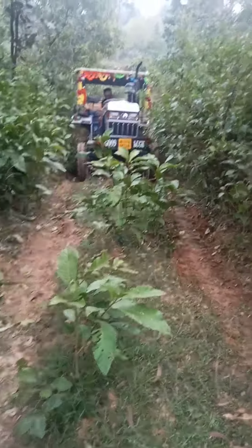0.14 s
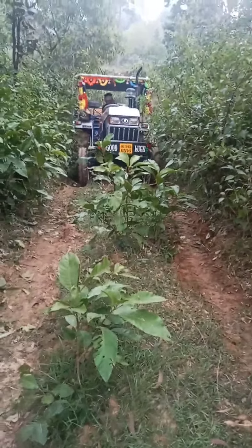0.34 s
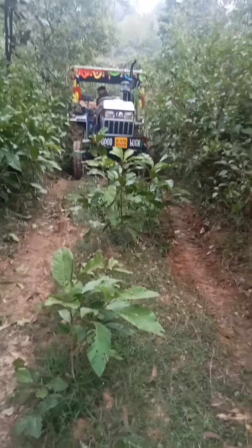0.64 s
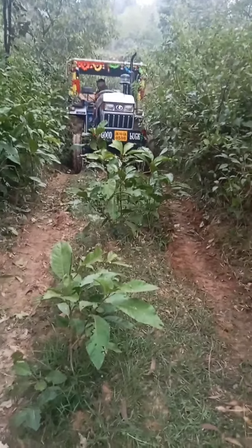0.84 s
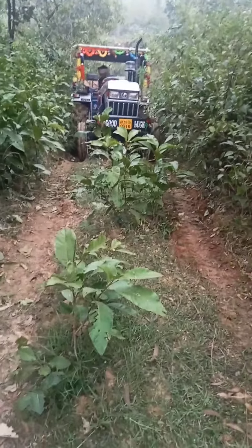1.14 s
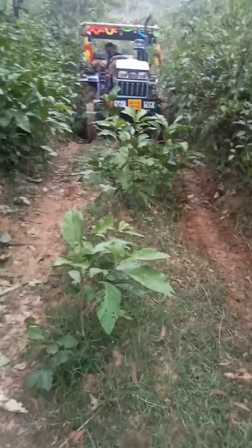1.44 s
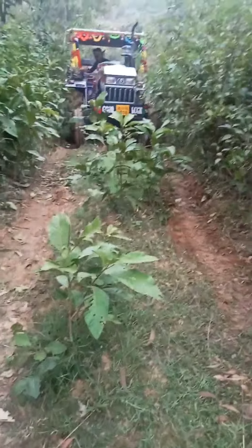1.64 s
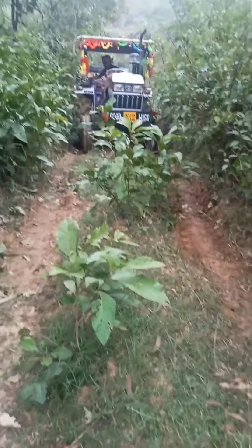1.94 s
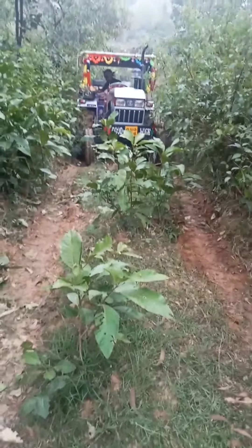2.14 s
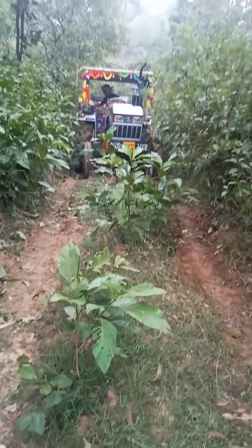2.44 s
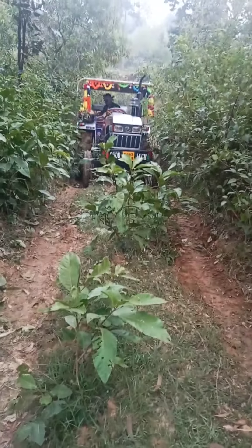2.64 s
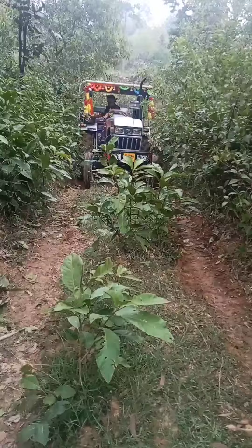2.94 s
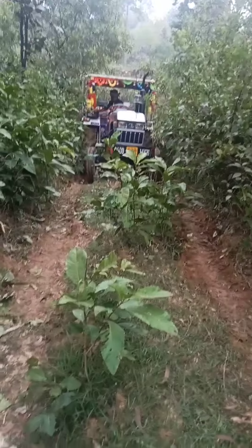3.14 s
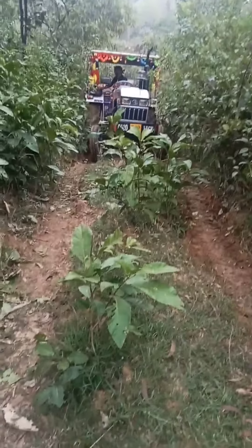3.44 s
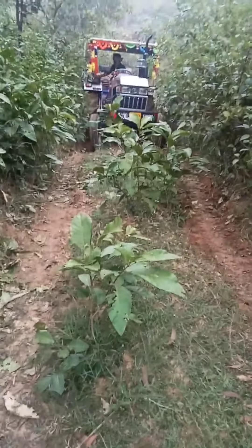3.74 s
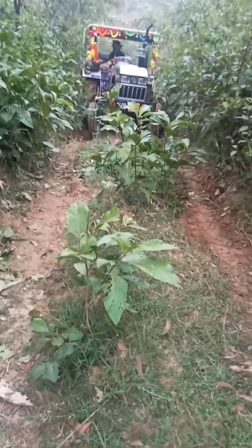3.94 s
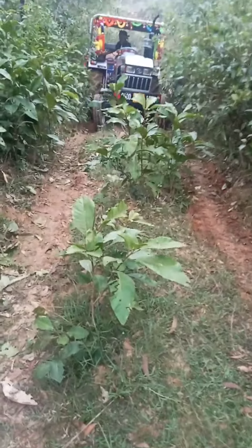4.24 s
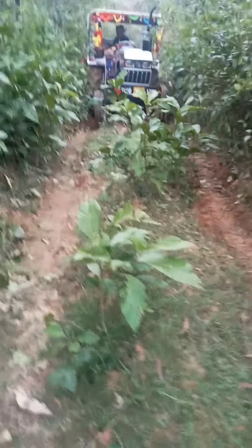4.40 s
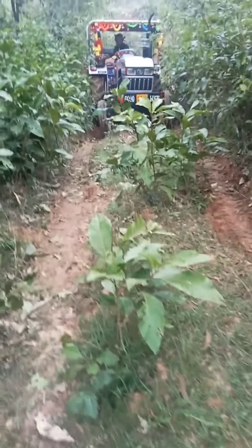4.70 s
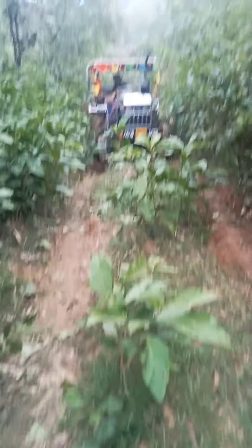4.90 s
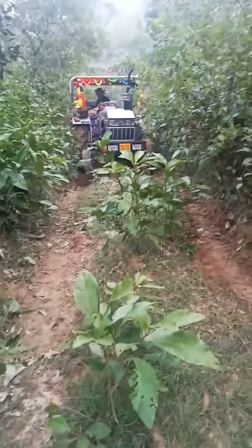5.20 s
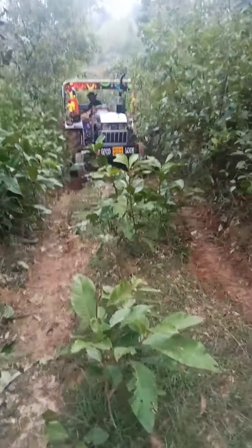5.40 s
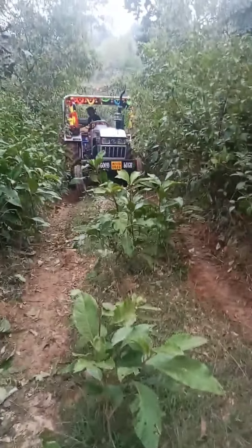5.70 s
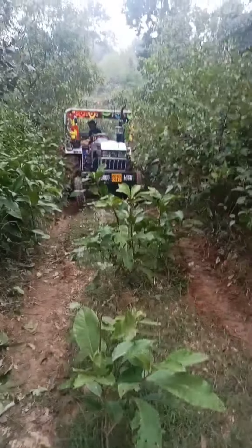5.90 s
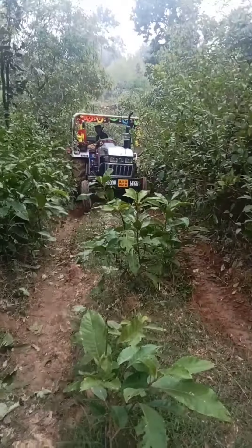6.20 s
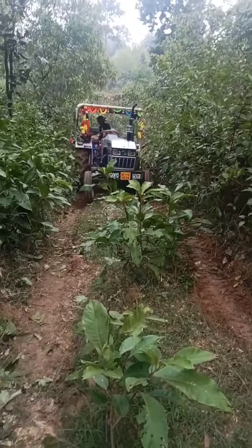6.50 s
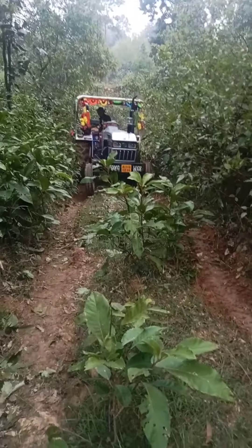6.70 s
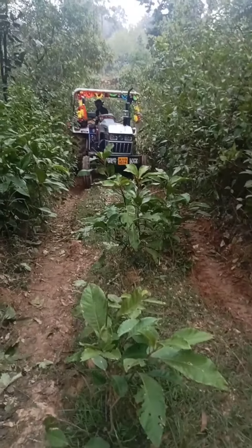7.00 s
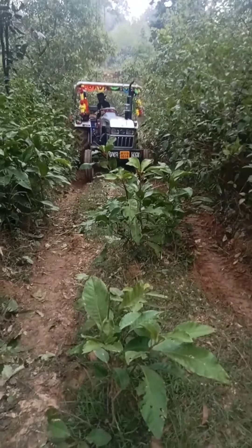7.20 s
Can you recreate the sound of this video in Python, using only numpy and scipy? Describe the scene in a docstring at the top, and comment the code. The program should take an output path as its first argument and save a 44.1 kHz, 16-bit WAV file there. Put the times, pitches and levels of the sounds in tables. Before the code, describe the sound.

A diesel tractor runs at high revs with a loud, rapid exhaust bark. After about a second the throttle shuts and the engine coasts down, clattering, while loose tin rings briefly. The bodywork jolts twice with a rattle and a thud. The engine settles into a quieter idle with a regular metallic knock over low thumps, hollow chugs, ticking and a faint gear whine, heard from along an outdoor dirt track.

```python
"""A diesel tractor barks at high revs, each firing pushing a pulse and a rush of gas out of its exhaust.
After a second the throttle shuts. The three-cylinder engine coasts down, clattering, while loose tin
rings. Fuel returns and it settles into an idle in which one cylinder knocks hardest: the fuel lights
abruptly and the iron clanks. Underneath are low thumps, hollow chugs, ticking, hiss and a gear whine.
The bodywork jolts twice, with a rattle and a thud."""
import sys
import numpy as np
from scipy import signal
from scipy.fft import rfft, irfft
from scipy.io import wavfile
from scipy.ndimage import uniform_filter1d

SR = 44100
rng = np.random.default_rng(int(sys.argv[2]) if len(sys.argv) > 2 else 0)


def wav_out(sig):
    """Save sig, one row per channel (or a flat mono array), as 16-bit PCM at SR to the path in sys.argv[1]."""
    wavfile.write(sys.argv[1], SR, np.round(np.clip(np.atleast_2d(sig).T, -1, 1) * 32767).astype(np.int16))


N = 324135
T = np.arange(N) / SR

IDLE_HZ, LOPE_HZ = 15, 17.9  # firings a second: at idle, and below which the thumps turn more uneven
SHUT_S, SHUTTING_S = 1.016, .0076  # the throttle shuts: when, and how long it takes
REFUEL_S, REFUELLING_S = 2.95, .3  # the governor (speed regulator) feeds fuel again
SETTLE_S, SETTLING_S = 4.37, 0.56  # the idle steadies and its sound fills out


def undb(db):
    """Turn decibels into a gain."""
    return 10 ** (np.asarray(db) / 20)


def unit(x):
    """Scale a signal to an average power of 1."""
    return x / np.sqrt(np.mean(x ** 2))


def curves(table):
    """Join a table's timed points with straight lines, one curve for each column after the time."""
    times, *columns = np.transpose(table)
    return [np.interp(T, times, column) for column in columns]


def colour(x, spectrum, resonances=()):
    """Filter a sound to a spectrum plus resonances; the result has power 1."""
    size = 8192
    hz = np.arange(size // 2 + 1) * SR / size + 1
    points_hz, points_db = np.transpose(spectrum)
    db = np.interp(np.log(hz), np.log(points_hz), points_db, left=-90, right=-90)
    db = db + sum(peak / (1 + (2 * (hz - f) / width) ** 2) for f, width, peak in resonances)
    # folding the cepstrum makes the filter ring after a hit, never before it
    cepstrum = irfft(db * np.log(10) / 20)
    cepstrum[1:size // 2] *= 2
    cepstrum[size // 2 + 1:] = 0
    response = irfft(np.exp(rfft(cepstrum)))
    return unit(signal.fftconvolve(x, response)[:N])


def grit(spread_db, rate_hz):
    """Noise whose level jumps like many small metal contacts."""
    hold = int(SR / rate_hz)
    sizes = undb(spread_db * rng.standard_normal(N))
    return rng.standard_normal(N) * sizes[np.arange(N) // hold]


def bursts(count, hz, lag, rise_s, fall_s, scatter_db, cylinder_db=(0, 0, 0)):
    """One swell and fade per firing, lag firings late, each with its own size."""
    turn = count + 1 - lag
    firing, since = turn.astype(int), turn % 1 / hz
    size = undb(scatter_db * rng.standard_normal(N)[firing] + np.array(cylinder_db)[(firing - 1) % 3])
    return size * (1 - np.exp(-since / rise_s)) * np.exp(-since / fall_s)


def throttle():
    """1 while the throttle is open, then 0."""
    return np.clip((SHUT_S - T) / SHUTTING_S, 0, 1)


def idle_fuel():
    """0 until the governor feeds the idle, then 1."""
    return np.clip((T - REFUEL_S) / REFUELLING_S, 0, 1)


def engine_gain(hz, base_db, octave_db, load_db, fuel_db, settled_db):
    """A layer's gain: its base at idle speed, changed by speed, open throttle, idle fuel and settling."""
    settled = np.clip((T - SETTLE_S) / SETTLING_S, 0, 1)
    coasting_db = base_db + octave_db * np.log2(hz / IDLE_HZ)
    return undb(coasting_db + load_db * throttle() + fuel_db * idle_fuel() + settled_db * settled)


def steady_share():
    """How much noise runs on between strokes: most when the engine gets no fuel."""
    coasting, loaded, idling = .9, .4, .32
    return coasting + (loaded - coasting) * throttle() + (idling - coasting) * idle_fuel()


# Engine speed: (time [s], firings a second [Hz])
FIRING_RATE = [(0, 45.406), (0.35, 45.19), (1, 46.314), (1.4, 37.859), (1.95, 25.278), (2.2, 22.861),
               (2.5, 21.222), (2.9, 19.882), (3.3, 17.94), (3.7, 16.647), (4.1, 16.56), (4.5, 15.854),
               (5.2, 15.31), (7.35, 14.986)]


def firings():
    """The running count of firings, and their rate; every engine sound follows these."""
    hz = curves(FIRING_RATE)[0]
    return 1.14 + np.cumsum(hz) / SR, hz


def gear_whine(count, hz):
    """Gear teeth meet in a wavering tone; three firings take two turns of the crank."""
    teeth = 25
    phase = 2 * np.pi * teeth * count * 2 / 3
    tone = np.sin(phase) + undb(-3) * np.sin(2 * phase) + undb(-1.5) * np.sin(3 * phase)
    waver = undb(6 * unit(uniform_filter1d(rng.standard_normal(N), size=3000)))
    return engine_gain(hz, -61, octave_db=10, load_db=3, fuel_db=-9, settled_db=0) * waver * tone


# High hiss: (frequency [Hz], level [dB])
HISS_SPECTRUM = [(4120, 10.5), (7000, -10.5), (7410, -17.5), (8080, -18.5), (8750, -8), (9630, -14.5),
                 (13000, -1), (15500, -15)]


def hiss(count, hz):
    """A thin hiss swells with each firing."""
    drive = grit(1.5, 400) * (steady_share() ** 2 + .3 + bursts(count, hz, -.02, .003, .014, 4.5))
    gain = engine_gain(hz, -79.5, octave_db=17.5, load_db=8, fuel_db=6.5, settled_db=5.5)
    return gain * colour(drive, HISS_SPECTRUM)


# Engine block and bonnet resonances, and dips where the ground echo cancels:
# (frequency [Hz], width [Hz], boost [dB])
BLOCK_RESONANCES = [(626, 260, 1), (756, 194, 10), (1100, 41, 5.5), (1387, 36, -61), (1650, 50, -5),
                    (1817, 38, 7), (2220, 120, -1.5), (2590, 67, 4.5), (2760, 130, 0.5), (3260, 140, 8),
                    (3560, 33, 3.5), (4050, 67, 3), (4535, 17, 10), (5364, 77, 6.5)]
# Steel injector seats: (frequency [Hz], level [dB])
INJECTOR_SPECTRUM = [(2500, -21), (3500, -1), (4200, -1), (5000, 1.5), (5900, -7.5), (6600, -14.5),
                     (7300, -23.5), (8500, -32)]


def injectors(count, hz):
    """The fuel injectors tick against their seats, once per firing."""
    drive = grit(1.5, 600) * (.12 + bursts(count, hz, .02, .004, .008, 1.3))
    gain = engine_gain(hz, -63.5, octave_db=19, load_db=-4, fuel_db=-12, settled_db=7.5)
    return gain * colour(drive, INJECTOR_SPECTRUM, BLOCK_RESONANCES)


# Air box, space under the bonnet and exhaust pipe: (frequency [Hz], width [Hz], boost [dB])
AIR_RESONANCES = [(240, 35, 5), (335, 35, 6), (625, 50, 8), (1110, 60, 7)]
# Oil pan under the engine: (frequency [Hz], level [dB])
OIL_PAN_SPECTRUM = [(25, -28), (45, -3), (70, -11), (120, -2), (160, -1.5), (235, -0.5), (290, -2),
                    (345, -4), (400, -11.5), (480, -20.5)]


def oil_pan(count, hz):
    """The oil pan rumbles in time with the firings."""
    drive = grit(1.5, 90) * (.2 + bursts(count, hz, .03, .008, .025, 1.5))
    gain = engine_gain(hz, -52, octave_db=15, load_db=-5.5, fuel_db=7, settled_db=1.7)
    return gain * colour(drive, OIL_PAN_SPECTRUM, AIR_RESONANCES)


def thump(count, hz):
    """Each compression stroke pushes a short low wave, with a weaker one ahead of it."""
    pitch_hz, width_s = 92, .0077
    uneven = .3 + .7 * np.clip(LOPE_HZ - hz, 0, 1)
    waves = 0
    for lag, db in [(-.091, 6.5), (-.395, -.5)]:
        turn = count - lag + .5
        stroke = turn.astype(int)
        late_s = .0018 * uneven * rng.standard_normal(N)[stroke]
        from_peak = (turn % 1 - .5) / hz - late_s
        size = undb(db + 2.2 * uneven * rng.standard_normal(N)[stroke])
        waves += size * np.cos(2 * np.pi * pitch_hz * from_peak) * np.exp(-(from_peak / width_s) ** 2)
    gain = engine_gain(hz, -45, octave_db=9, load_db=3.5, fuel_db=-2.5, settled_db=0)
    return gain * unit(waves * np.sqrt(IDLE_HZ / hz))


# Hollow sound of air box and exhaust pipe: (frequency [Hz], level [dB])
CHUG_SPECTRUM = [(330, -16), (470, -4.5), (550, -3), (630, -5), (760, -0.5), (900, -0.5), (1100, -5.5),
                 (1280, -13.5), (1450, -37)]


def chug(count, hz):
    """Air box and exhaust pipe give a rounded puff after every stroke, with little between."""
    puffs = .23 * steady_share() + bursts(count, hz, .037, .0081, .024, 1.2)
    gain = engine_gain(hz, -51.5, octave_db=10, load_db=.5, fuel_db=3.5, settled_db=1.5)
    return gain * colour(grit(1.65, 200) * puffs, CHUG_SPECTRUM, AIR_RESONANCES)


# Clattering valve parts: (frequency [Hz], level [dB])
VALVE_SPECTRUM = [(820, -32), (1400, 2.5), (1780, 0), (2070, -8), (2610, -5.5), (3650, -15.5), (4230, -11),
                  (4980, -14.5), (6700, -35.5), (9000, -51), (11700, -45), (19800, -120)]


def valves(count, hz):
    """The parts that work the valves clatter through the engine block."""
    drive = grit(2, 500) * (steady_share() + bursts(count, hz, -.03, .003, .025, 1.6))
    gain = engine_gain(hz, -47.5, octave_db=8, load_db=4.1, fuel_db=7, settled_db=1.2)
    return gain * colour(drive, VALVE_SPECTRUM, BLOCK_RESONANCES)


# Notes of loose tin: (time of peak [s], frequency [Hz], level [dB], fade time [s])
TIN_NOTES = [(1.059, 219, -20.5, 0.075), (1.147, 293, -21, 0.026), (1.47, 502, -32.5, 0.031),
             (1.45, 993, -32.5, 0.028), (1.042, 3290, -23, 0.0064), (1.733, 787, -31, 0.017),
             (1.753, 212, -30, 0.019)]


def loose_tin():
    """Loose tin swells and fades on single notes while the revs fall."""
    return sum(undb(db) * np.sin(2 * np.pi * f * (T - peak_s)) * np.exp(-((T - peak_s) / fade_s) ** 2)
               for peak_s, f, db, fade_s in TIN_NOTES)


# Jolts: (time [s], rattle level [dB], rattle length [s], thud delay [s], thud level [dB])
BODY_JOLTS = [(2.076, -29.5, 0.051, 0.028, -29.5), (4.114, -34, 0.049, 0.0144, -40)]
# Notes of a body panel: (frequency [Hz], level [dB], time to fade by 60 dB [s])
PANEL_NOTES = [(152, 11.5, 0.13), (193.7, 8.5, 0.22), (290, 13, 0.05), (318, 2, 0.2)]
# Rattling bodywork: (frequency [Hz], level [dB])
RATTLE_SPECTRUM = [(300, -49), (600, 8.5), (880, 19), (1300, -33.5), (2600, 4), (4000, 3.5), (6500, -12)]


def jolts():
    """Each jolt rattles the bodywork first, then a panel thuds."""
    thuds, shaking = np.zeros(N), np.zeros(N)
    for start_s, rattle_db, length_s, delay_s, thud_db in BODY_JOLTS:
        since = np.maximum(T - start_s, 0)
        shaking += undb(rattle_db) * (since > 0) * np.exp(-(since / length_s) ** 2)
        since = np.maximum(T - start_s - delay_s, 0)
        push = 1 - np.exp(-(since / .003) ** 2)  # rubber mounts soften the blow
        for f, db, fade_s in PANEL_NOTES:
            fade = 1000. ** (-since / fade_s)
            thuds += undb(thud_db + db) * push * np.sin(2 * np.pi * f * since) * fade
    rattle = colour(grit(1.3, 400) * shaking, RATTLE_SPECTRUM, [(950, 67, 5.9), (2550, 250, 13)])
    return thuds + np.sqrt(np.mean(shaking ** 2)) * rattle


# Cast iron struck by the burning fuel: (frequency [Hz], level [dB], time to fade by 60 dB [s])
IRON_NOTES = [(1480, -4, 0.25), (1514, -2.5, 0.073), (1726, 5.5, 0.063), (1780, -6.5, 0.062),
              (1893, -20, 0.076), (1900, 3.5, 0.13), (2454, 1.5, 0.11), (2671, 4, .07), (2855, 3, 0.032),
              (2915, 0.5, 0.018), (3045, 0, 0.055), (3130, -11, 0.022), (3360, 1, 0.034), (3747, -1, 0.059),
              (4175, -2.5, 0.049), (4770, -18, 0.061), (4750, -7.5, 0.099)]


def iron_ring(drive, count, vary_db):
    """The iron rings on many notes at once; every firing strikes them in a different mix."""
    ringing = 0
    for f, db, fade_s in IRON_NOTES:
        pole = np.exp(2j * np.pi * f / SR - np.log(1000) / (fade_s * SR))  # one fading note
        share = undb(db + vary_db * rng.standard_normal(N // 100)[count.astype(int)])
        ringing += signal.lfilter([1], [1, -pole], share * drive * np.sqrt(1 - abs(pole))).imag
    # the clank is kept to its middle range; the phone's microphone dulls the top
    band = signal.butter(8, [1100, 5600], "band", fs=SR, output="sos")
    return unit(signal.sosfilt(band, ringing))


# Crack of the fuel lighting: (frequency [Hz], level [dB])
CRACK_SPECTRUM = [(240, -22), (400, -7), (983, -5.5), (1120, 8), (1260, -26), (1490, -3), (1890, 13),
                  (2070, -2), (2540, 4.5), (5010, -32), (9000, -96), (11700, -90), (19800, -120)]


def knock(count, hz):
    """The fuel lights abruptly with a crack and the iron clanks, hardest in one cylinder of the three."""
    blows = bursts(count, hz, lag=-.05, rise_s=.001, fall_s=.017, scatter_db=.7,
                   cylinder_db=(0, -13, -12))
    crack = colour(grit(3.2, 700) * blows, CRACK_SPECTRUM, BLOCK_RESONANCES)
    clank = iron_ring(grit(2, 800) * blows, count + .1, vary_db=3)
    gain = engine_gain(hz, -51, octave_db=5, load_db=-2, fuel_db=12.5, settled_db=.44)
    return gain * (undb(-9.5) * crack + undb(-4) * clank)


# Exhaust strength with the throttle open: (time [s], bark level [dB], noise level [dB])
EXHAUST_LEVELS = [(0, -17, -27), (.25, -17, -26), (.5, -17, -28), (.75, -15, -27), (1.0, -17, -29.5)]
# Tones that make up the pressure pulses: (multiple of the firing rate, level [dB])
BARK_TONES = [(1, -43), (2, 6.5), (3, 6.5), (4, 0.5), (5, -6.5), (6, -44), (7, -18.5), (8, -45)]
# Rushing gas: (frequency [Hz], level [dB])
GAS_SPECTRUM = [(820, -21), (1400, -3.5), (1760, -20), (2070, -2.5), (2430, 5), (2890, -10), (3290, -3.5),
                (3530, -17), (3830, -7), (5340, -2), (7740, -32), (12700, -22), (15500, -27)]
# Pop of the exhaust pipe: (frequency [Hz], level [dB])
POP_SPECTRUM = [(250, -35), (400, -3), (560, -2.5), (760, -4), (1000, 0.5), (1270, -33), (1500, -30)]


def exhaust(count, hz):
    """Pressure pulses bark from the pipe, each with a gas rush, pop and clang, until the throttle shuts."""
    bark_db, noise_db = curves(EXHAUST_LEVELS)
    turn = count - .715
    # each pulse has its own size, changing in the quiet between pulses
    size = uniform_filter1d(undb(.62 * rng.standard_normal(N))[(turn + .5).astype(int)], size=300)
    bark = size * sum(undb(db) * np.cos(2 * np.pi * k * turn) for k, db in BARK_TONES)
    gas_drive = grit(1.7, 900) * (.088 + bursts(count, hz, .332, .001, .0031, 1))
    gas = colour(gas_drive, GAS_SPECTRUM, BLOCK_RESONANCES)
    pop_drive = grit(1.7, 900) * (.1 + bursts(count, hz, .537, .0013, .0021, 3.1))
    pop = colour(pop_drive, POP_SPECTRUM, BLOCK_RESONANCES)
    clang_drive = grit(2, 800) * bursts(count, hz, .47, .001, .003, 2)
    clang = iron_ring(clang_drive, count + .6, vary_db=4)
    noise = undb(-6) * gas + undb(-3.5) * pop + undb(-7.5) * clang
    return throttle() * (undb(bark_db) * unit(bark) + undb(noise_db) * noise)


def scene():
    """Add the engine's layers and the bodywork into one channel."""
    count, hz = firings()
    layers = (exhaust, oil_pan, valves, injectors, hiss, thump, chug, gear_whine, knock)
    engine = sum(layer(count, hz) for layer in layers)
    return (engine + jolts() + loose_tin())[None]


def record(dry):
    """The phone drops the deepest bass and cuts the highest treble."""
    dry = signal.sosfilt(signal.butter(2, 35, "high", fs=SR, output="sos"), dry)
    return signal.sosfilt(signal.ellip(10, .2, 70, 15655, fs=SR, output="sos"), dry)


dry = scene()
out = record(dry)
wav_out(out)
```